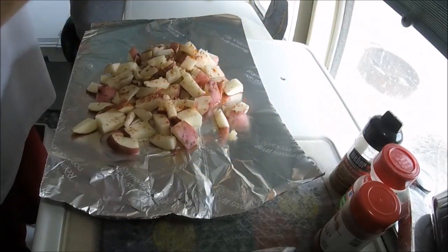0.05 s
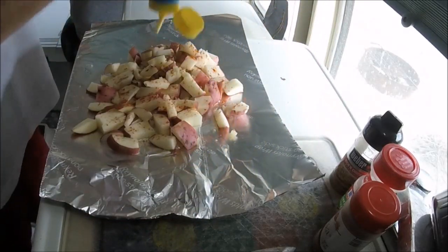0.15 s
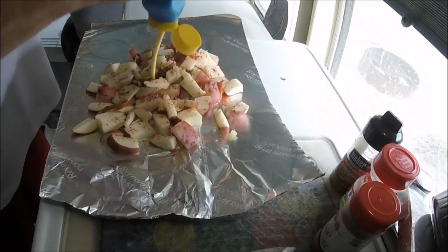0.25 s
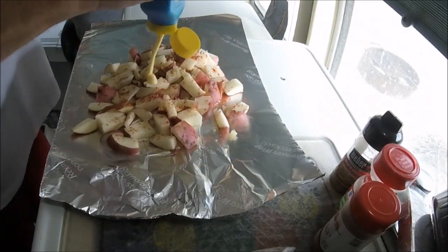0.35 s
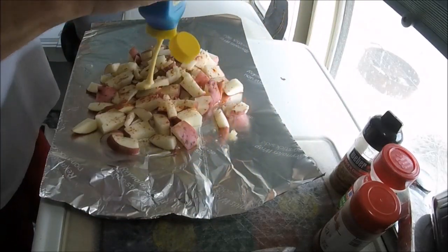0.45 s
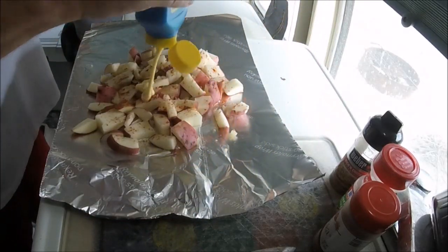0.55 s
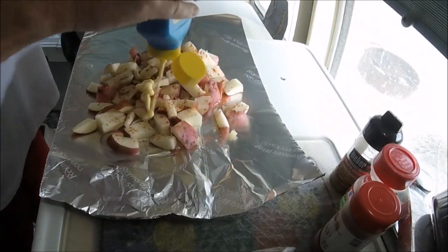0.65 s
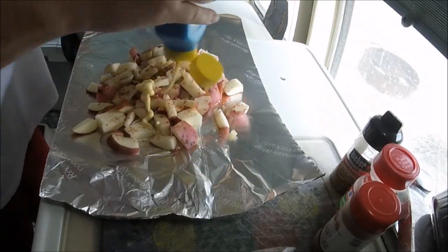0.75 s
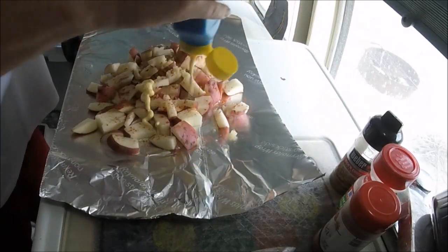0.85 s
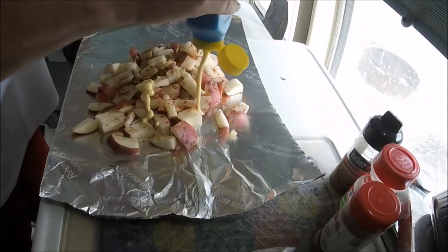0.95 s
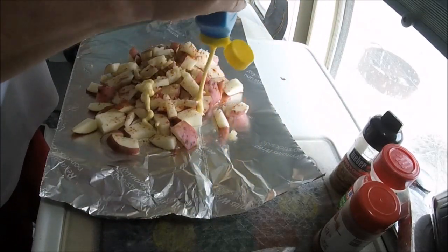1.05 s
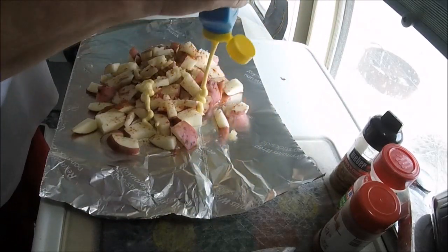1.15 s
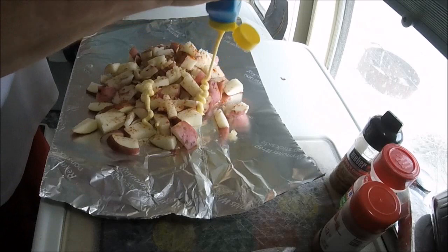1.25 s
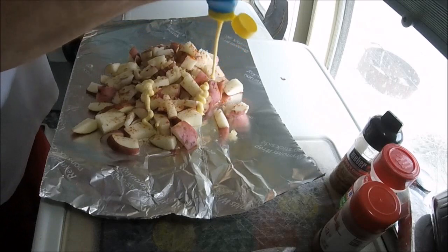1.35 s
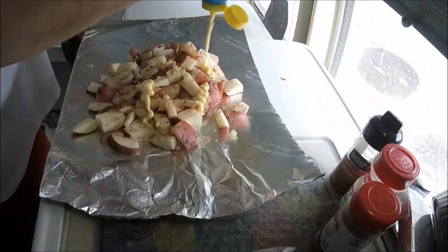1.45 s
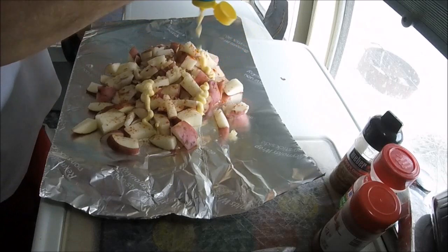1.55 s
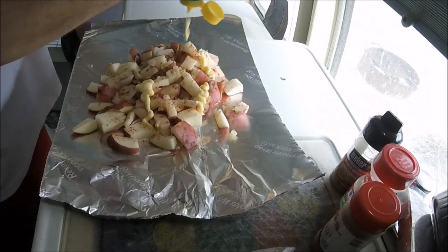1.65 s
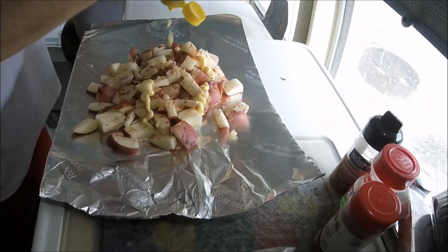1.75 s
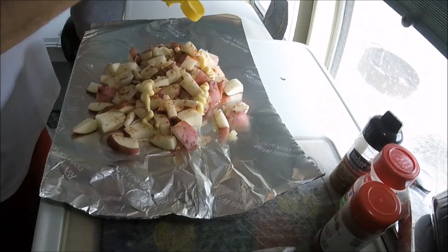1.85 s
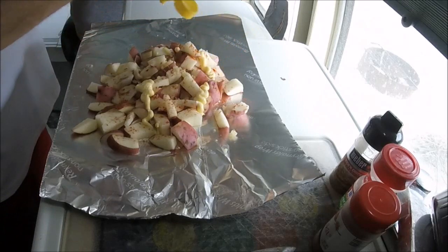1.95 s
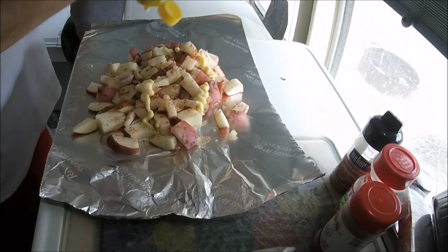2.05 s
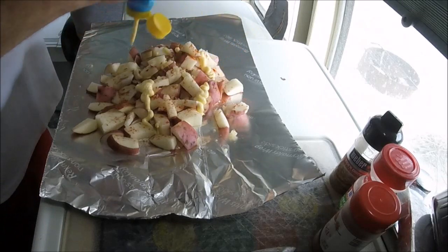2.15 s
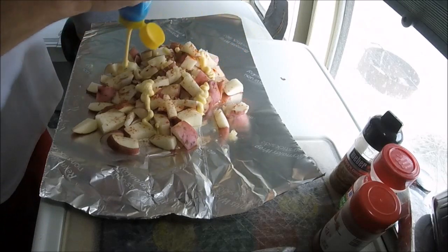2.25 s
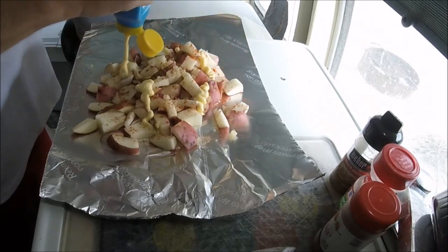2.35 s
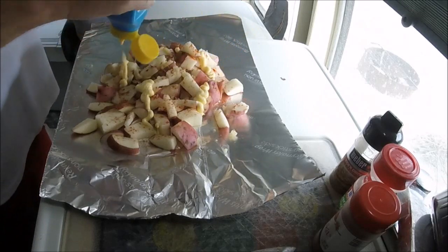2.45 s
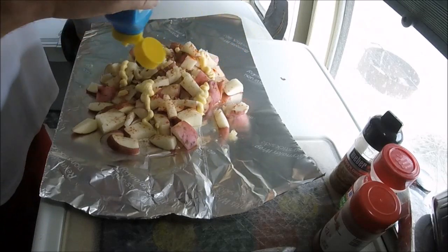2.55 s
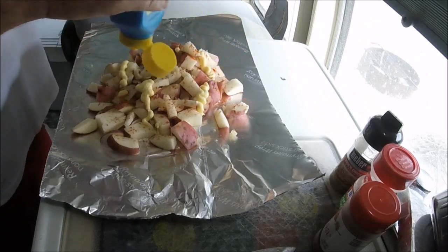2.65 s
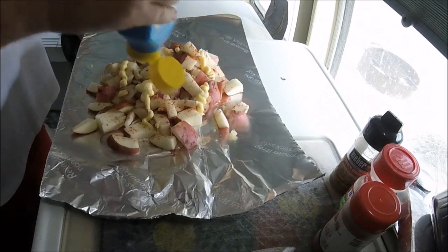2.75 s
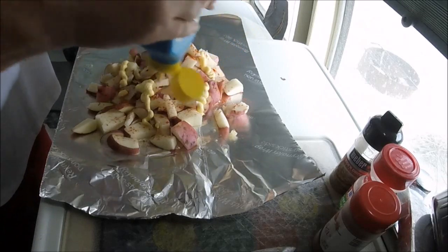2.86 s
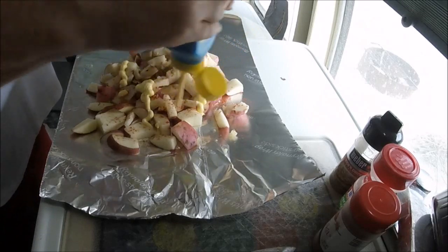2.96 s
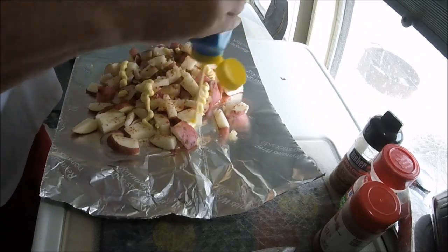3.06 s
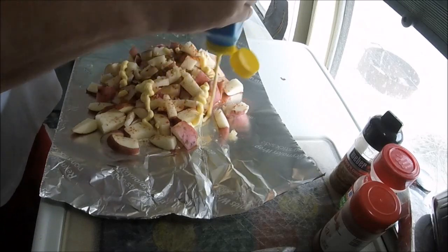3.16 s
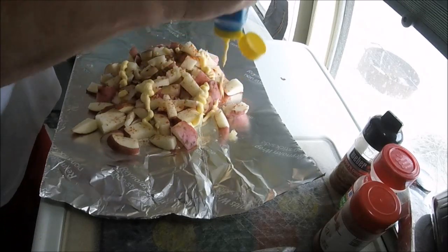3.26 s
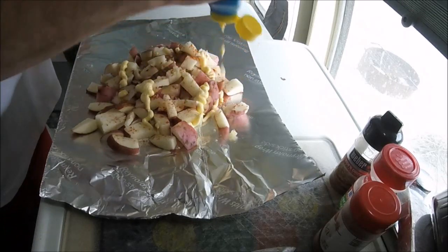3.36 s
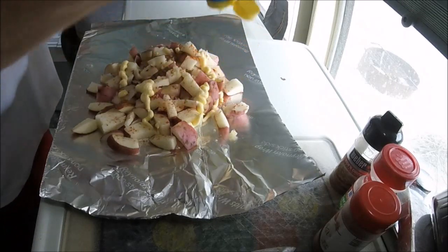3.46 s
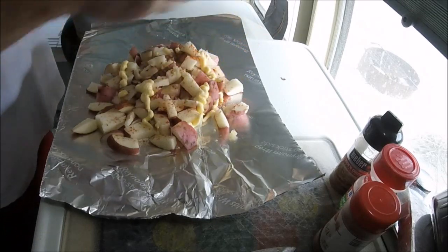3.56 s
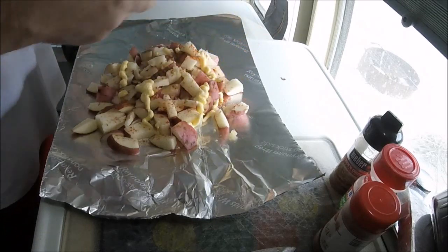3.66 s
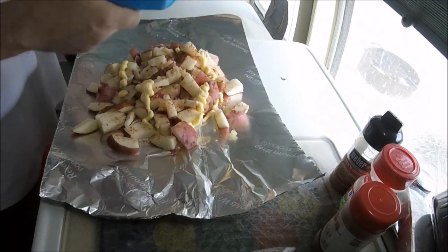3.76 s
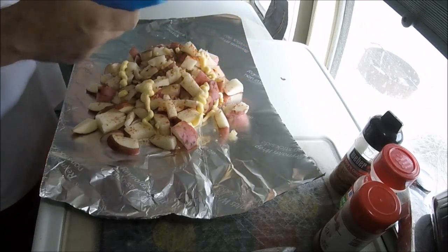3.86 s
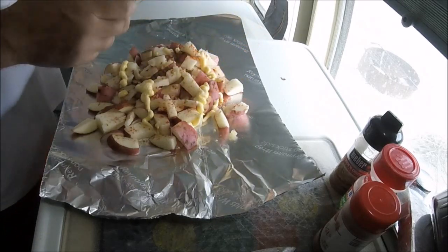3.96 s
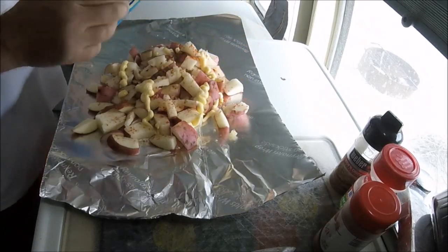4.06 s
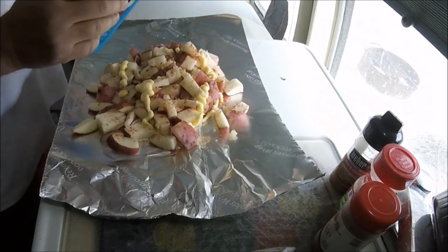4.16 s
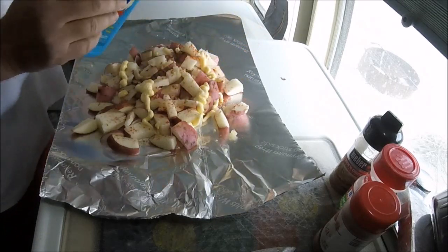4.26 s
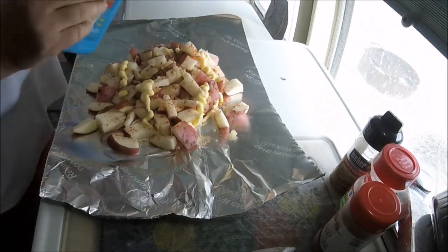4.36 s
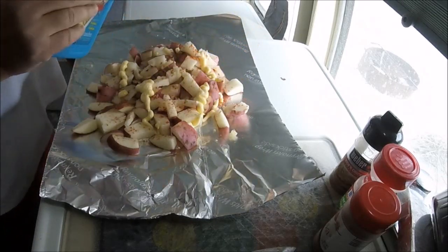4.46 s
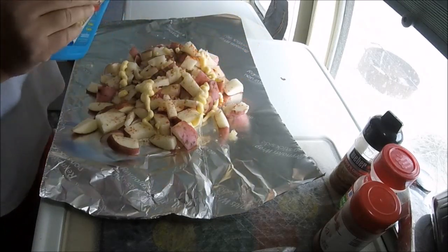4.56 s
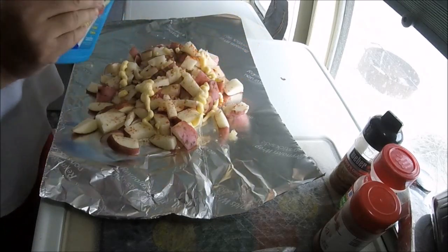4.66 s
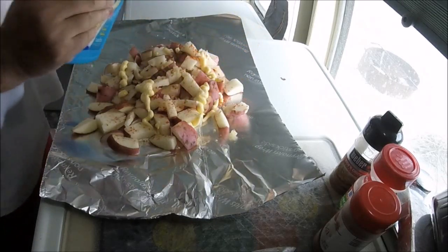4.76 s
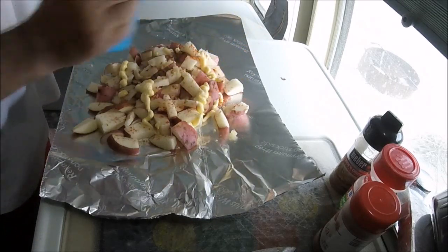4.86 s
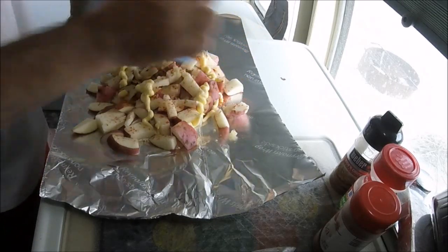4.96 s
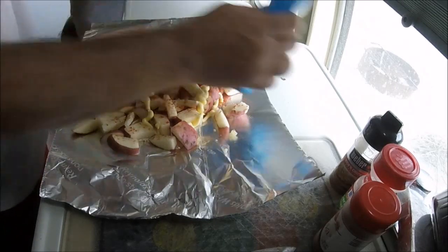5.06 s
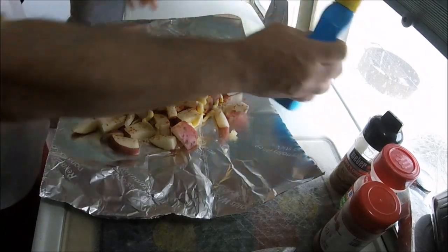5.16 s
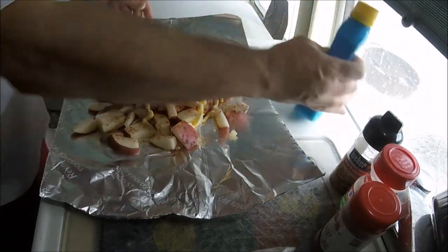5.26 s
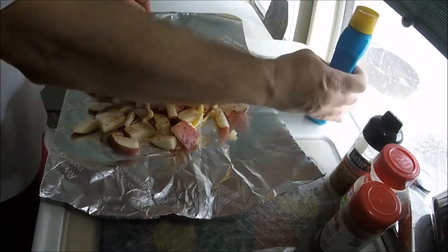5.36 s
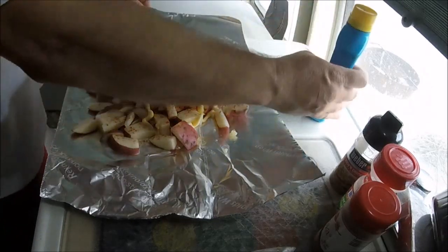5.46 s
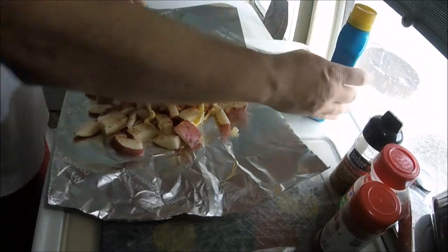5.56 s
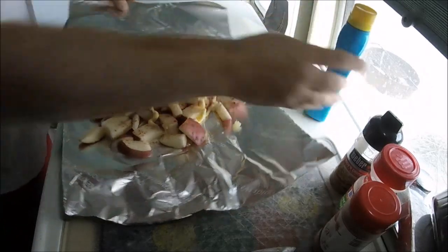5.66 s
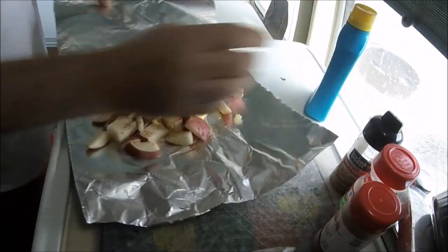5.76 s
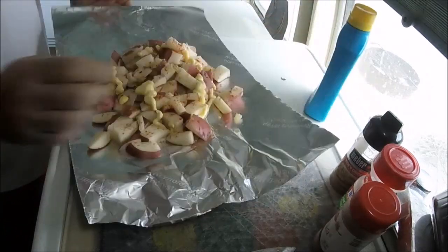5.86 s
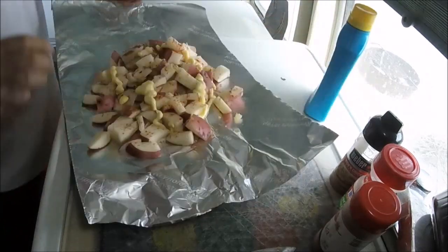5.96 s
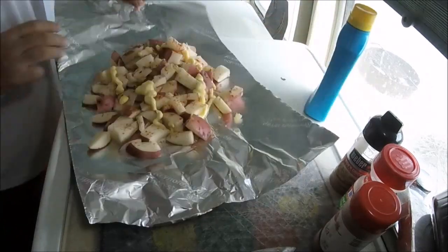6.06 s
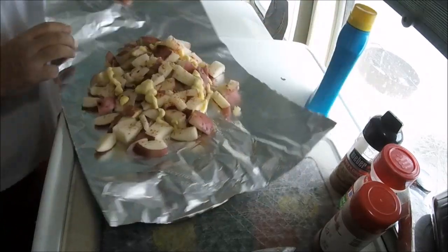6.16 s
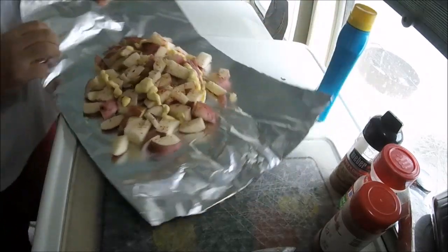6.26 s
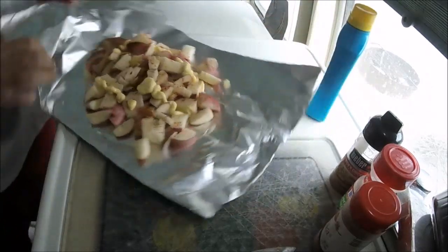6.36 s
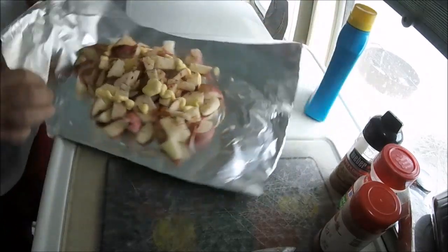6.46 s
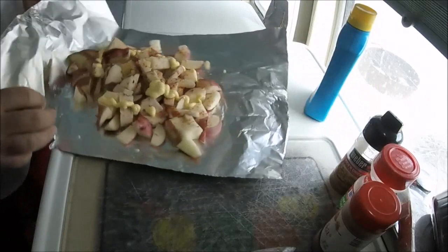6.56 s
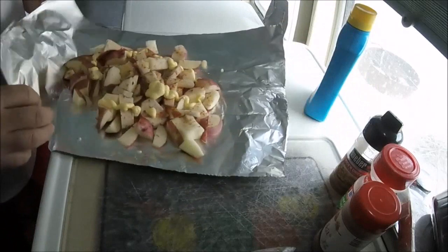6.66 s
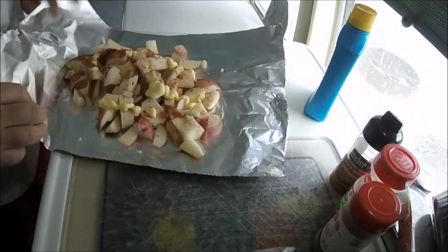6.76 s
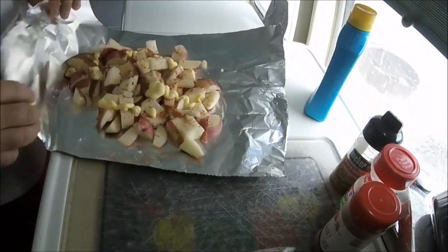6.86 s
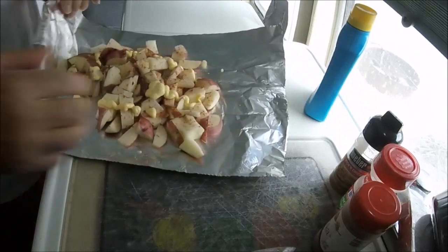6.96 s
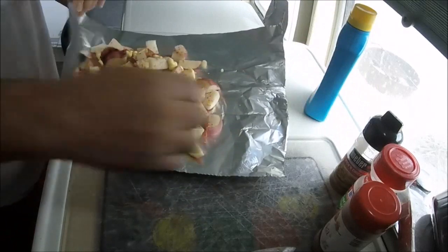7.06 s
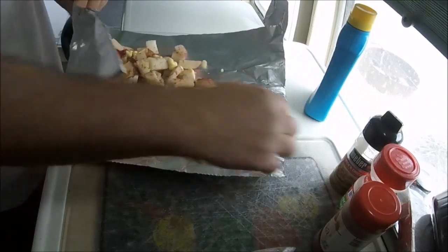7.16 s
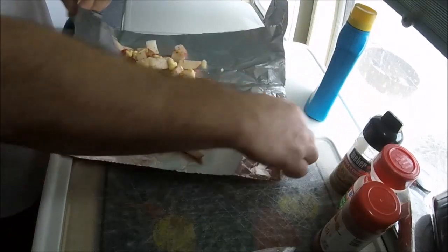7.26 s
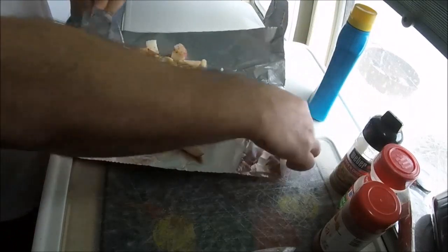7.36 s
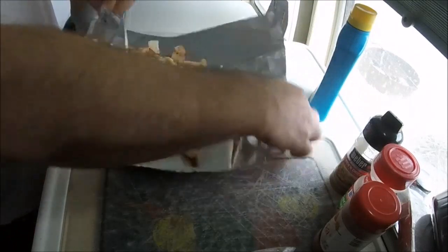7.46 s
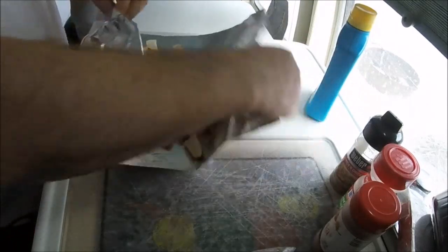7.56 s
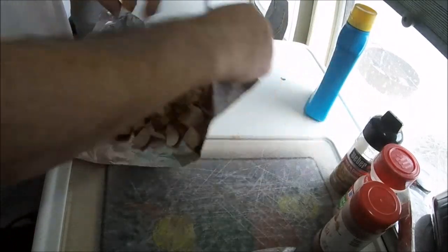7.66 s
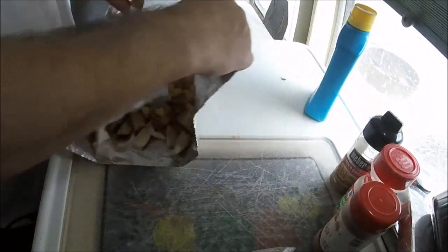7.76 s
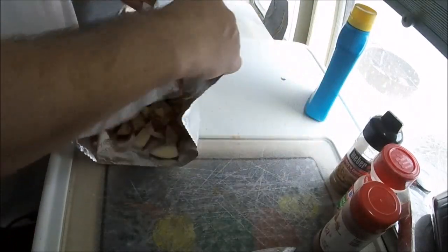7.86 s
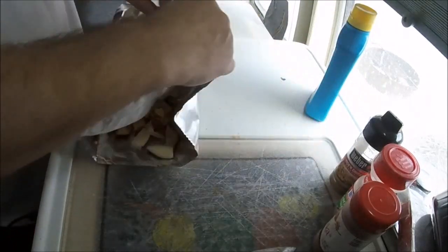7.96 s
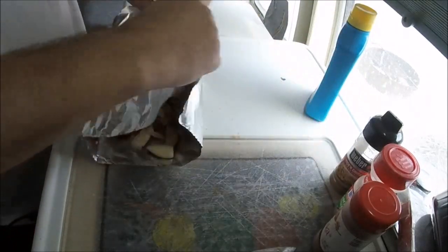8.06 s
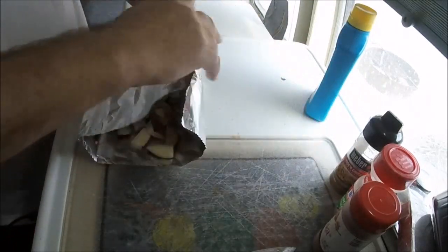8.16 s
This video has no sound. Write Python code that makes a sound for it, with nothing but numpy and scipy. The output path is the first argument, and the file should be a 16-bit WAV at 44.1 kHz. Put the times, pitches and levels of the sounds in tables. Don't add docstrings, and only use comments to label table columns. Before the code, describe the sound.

Over a droning appliance hum, brief wet sputters, a sharp plastic click and a knock, then foil crinkling, juddering and folding with bumps.

```python
import sys
import numpy as np
from scipy import signal
from scipy.fft import rfft, irfft, dct, next_fast_len
from scipy.io import wavfile
from scipy.ndimage import uniform_filter1d

SR = 44100
rng = np.random.default_rng(int(sys.argv[2]) if len(sys.argv) > 2 else 0)


def generate_wav(signal):
    frames = np.transpose(np.atleast_2d(signal))
    scaled = np.clip(frames, -1, 1) * 32767
    pcm = np.round(scaled).astype(np.int16)
    wavfile.write(sys.argv[1], SR, pcm)


def gain_from_decibels(decibels):
    exponent = np.asarray(decibels, float) / 20
    return 10 ** exponent


N = 361517


def rms_one(x):
    return x / np.sqrt(np.mean(x ** 2) + 1e-20)


def at_hz(points, hz):
    points_hz, points_db = np.transpose(points)
    return np.interp(np.log(hz), np.log(points_hz), points_db)


def drift(rate):
    r = np.exp(-80 * np.pi * rate / SR)
    slow = signal.lfilter([1], [1, -2 * r, r * r], rng.standard_normal(N // 40 + 2002))[2000:]
    return np.interp(np.arange(N) / 40, np.arange(len(slow)), rms_one(slow))


def ring(clicks, hz, t60):
    r, w = gain_from_decibels(-60 / (t60 * SR)), 2 * np.pi * hz / SR
    return signal.lfilter([0, np.sin(w)], [1, -2 * r * np.cos(w), r * r], clicks + 1e-18)


def resonance(x, hz, width):
    r = np.exp(-np.pi * width / SR)
    w = 2 * np.pi * hz / SR
    return signal.lfilter([(1 - r * r) / 2, 0, (r * r - 1) / 2], [1, -2 * r * np.cos(w), r * r], x)


def bursts(rows, rise_s):
    out = np.zeros((3, N))
    for s, peak_db, dull_db, top_db, t60 in rows:
        at = round(s * SR)
        t = np.arange(min(N - at, SR // 2)) / SR
        shape = gain_from_decibels(-60 * t / max(t60, .005)) * np.minimum(t / max(rise_s, 1e-4), 1)
        out[:, at:at + len(t)] += gain_from_decibels(peak_db + np.array([[dull_db], [0], [top_db]])) * shape
    return out


def crackle(levels, per_s, spread_db, cycles, patchy_db, trims_db):
    # pitch in Hz, level in dB per Hz.
    facet_tone = [(530, -1.5), (900, 0), (1160, -13), (1910, -4), (2720, -13.5), (3540, -4), (6500, -6),
                  (12100, -16.5), (15500, -32)]
    dull_below_hz, top_above_hz = 2500, 8000
    sizes = gain_from_decibels(abs(spread_db) * np.minimum(rng.exponential(1, N), 4)) * rng.choice([-1, 1], N)
    snaps = rms_one(sizes * (rng.random(N) < per_s / SR))
    pitches, dealt = np.geomspace(700, 14800, 32), rng.integers(0, 32, N)
    weights = gain_from_decibels(at_hz(facet_tone, pitches)) * np.sqrt(pitches)
    weights = weights / np.sqrt(np.sum(weights[pitches > dull_below_hz] ** 2))
    patches = [gain_from_decibels(patchy_db * drift(3.9)) for _ in range(8)]
    out, first = np.zeros(N), np.argmax(levels[1] > 1e-5)
    for k, hz in enumerate(pitches):
        lift = np.sqrt(len(pitches) * 4 * np.log(1000) * hz / (cycles * SR))
        zone = int(hz > dull_below_hz) + int(hz > top_above_hz)
        envelope = levels[zone] * gain_from_decibels(trims_db[zone]) * patches[k % len(patches)]
        force = envelope * snaps * (dealt == k)
        out[first:] += weights[k] * lift * ring(force[first:], hz, cycles / hz)
    return out


def strike(hits, modes, trim_db, soft_hz):
    hits, out = np.array(hits), np.zeros(N)
    at = np.round(hits[:, 0] * SR).astype(int)
    luck_db = rng.normal(0, 1.5, (len(hits), len(modes)))
    heard = slice(at.min(), at.max() + SR)
    for k, (hz, level_db, t60) in enumerate(modes):
        clicks = np.zeros(N)
        clicks[at] = gain_from_decibels(hits[:, 1] + level_db + trim_db + luck_db[:, k])
        out[heard] += ring(clicks[heard], hz, t60) * (-1) ** k
    return signal.lfilter(*signal.butter(1, min(soft_hz, 18000), fs=SR), out)


def hum():
    fan_hz, motor_hz, mains_hz, mains_db = 23.97, 57.975, 119.935, -38.5
    fan_orders_db = [-37, -67, -61, -48.5, -60, -59.5, -40.5, -67, -68]
    motor_orders_db = [-26, -35, -41.5, -47]
    # pitch in Hz, width in Hz, rms level in dB.
    panels = [(60.1, 13, -72), (80.3, 9.1, -45.5), (126, 0.41, -53), (162.8, 3.8, -53.5), (760, 10.5, -53)]
    t = np.arange(N) / SR - 0.008
    lines = [(fan_hz * (k + 1), db) for k, db in enumerate(fan_orders_db)]
    lines += [(motor_hz * (k + 1), db) for k, db in enumerate(motor_orders_db)]
    lines += [(mains_hz, mains_db)]
    turns = rng.random(len(lines))
    turns[-1] = turns[len(fan_orders_db) + 1]
    out = np.zeros(N)
    for (hz, db), turn in zip(lines, turns):
        out += gain_from_decibels(db + 0.72 * drift(0.64)) * np.sin(2 * np.pi * (hz * t + turn))
    for hz, width, db in panels:
        shaken = resonance(rng.standard_normal(N + SR), hz, width)
        out += gain_from_decibels(db) * rms_one(resonance(shaken, hz, width)[SR:])
    return out


def air():
    # frequency in Hz, level in dB per Hz.
    air_tone = [(39, 4), (66, -6.5), (85, -3), (102, -20), (122, -9), (172, -11), (193, -12.5), (327, -20),
                (778, -19), (1120, -34), (1980, -34), (2860, -41.5), (8370, -48.5), (15500, -64)]
    air_db = -37.5
    hz = np.maximum(np.fft.rfftfreq(N, 1 / SR), 1)
    tone = rfft(rng.standard_normal(N)) * gain_from_decibels(at_hz(air_tone, hz))
    tone = tone / (1 + (45 / hz) ** 6)
    low, high = irfft(tone * (hz < 5000), N), irfft(tone * (hz >= 5000), N)
    noise = low + high * gain_from_decibels(1.9 * drift(46))
    return gain_from_decibels(air_db) * noise / np.std(irfft(tone * (hz > 200), N))


def fizz():
    cycle_hz, cycle_start_s = 25.025, 3.08
    # ms into the cycle, width in ms, level in dB.
    pulses = [(10.1, 3.1, -0.57), (27.6, 1, -1.8), (34.2, 3, -1)]
    # centre in Hz, width in Hz, rms level in dB.
    hiss_bands = [(4100, 1000, -59), (6380, 880, -60), (8310, 890, -59), (11800, 1100, -68.5)]
    ms = 1000 * ((np.arange(N) / SR - cycle_start_s) % (1 / cycle_hz))
    gate = sum(gain_from_decibels(db) * np.exp(-.5 * ((ms - at) / width) ** 2) for at, width, db in pulses)
    white = rng.standard_normal(N) * gate
    out = np.zeros(N)
    for hz, width, db in hiss_bands:
        out += gain_from_decibels(db) * rms_one(resonance(resonance(white, hz, width), hz, width))
    return out


def kitchen(x):
    t60_s, wall_cut_hz = 0.083, 21000
    size = next_fast_len(N + SR)
    hz = np.fft.rfftfreq(size, 1 / SR)
    walls, tail = 1 / (1 + 1j * hz / wall_cut_hz), 0
    for k, lag in enumerate(rng.uniform(.004, .022, 10)):
        loop = gain_from_decibels(-60 * lag / t60_s) * walls * np.exp(-2j * np.pi * hz * lag)
        tail = tail + (-1) ** k * loop / (1 - loop)
    return irfft(rfft(x, size) * tail, size)[:N]


def bottle():
    # start in seconds, peak in dB, dull part in dB, top part in dB,
    # decay in seconds.
    sputters = [(0.3858, -22.5, 2, -22, 0.043), (0.392, -13.5, -11, -30, 0.017),
                (1.5233, -39.5, 20, -10, 0.04), (1.5584, -21.5, -8, -27, 0.091),
                (1.6016, -27, 10, -14, 0.04), (1.6332, -23, -6, -18, 0.032), (1.653, -27.5, 1, -9, 0.063),
                (1.7124, -21, -1, -19, 0.049), (2.4508, -42, 5, 0, 0.04)]
    # time in seconds, peak in dB.
    cap_snap = [(4.4167, -9)]
    # pitch in Hz, level in dB, 60 dB decay in seconds.
    cap_modes = [(505, 7.5, 0.077), (670, -14, 0.062), (840, -4, 0.06), (1090, 5, 0.023), (1450, -23, 0.04),
                 (2030, 10.5, 0.027), (3090, -14, 0.028), (3730, 4, 0.035), (4220, 5, .04),
                 (5260, -1, 0.033), (6510, -15, 0.066), (8200, -2, 0.05)]
    # time in seconds, peak in dB.
    set_down = [
        (5.358, 2.5),
        (5.401, -11),
        (5.410, -14),
        (5.417, -13),
    ]
    # pitch in Hz, level in dB, 60 dB decay in seconds.
    counter_modes = [(121.7, 0.5, 0.074), (234, -3.5, 0.092), (297, 5.5, 0.073), (403, -1, 0.083),
                     (568, -6.5, 0.08), (664, -10, 0.18), (853, -1.5, 0.084), (1060, -20, 0.034),
                     (1820, -19, 0.027)]
    crack = bursts([(s, db + .5, -2.0, -10.0, .05) for s, db in cap_snap], rise_s=0.00016)
    levels = gain_from_decibels(-11.0) * bursts(sputters, rise_s=0.0018) + crack
    out = crackle(levels, per_s=36000, spread_db=1.5, cycles=16.4, patchy_db=-2.5, trims_db=[3.0, 0, 5.0])
    out += strike(cap_snap, cap_modes, trim_db=-10, soft_hz=9000)
    return out + strike(set_down, counter_modes, trim_db=-12.0, soft_hz=1500)


def taps():
    # time in seconds, peak in dB, pitch in Hz, 60 dB decay in seconds.
    low_taps = [(0.392, -14, 506, 0.025), (1.559, -11, 700, 0.026), (1.6, -14, 579, 0.023),
                (1.632, -8, 716, 0.026), (6.249, -13.5, 700, 0.047), (6.779, -7.5, 605, 0.029),
                (7.113, -17, 810, 0.02), (7.221, -7, 720, 0.017), (7.355, -2, 517, 0.025),
                (7.38, -11, 517, 0.012), (7.501, -6, 2070, 0.015), (7.521, -11, 496, 0.033),
                (7.5226, -7.5, 1950, 0.016), (7.792, -5.5, 510, 0.023), (7.805, -11, 1850, 0.031)]
    bright_ticks = [(0.393, -11.5, 6600, 0.01), (1.5604, -18, 6640, 0.012), (1.7135, -12.5, 6700, 0.0064),
                    (6.1729, -18, 6500, 0.022), (6.7784, -18, 3400, 0.012), (7.1134, -27, 6450, 0.012),
                    (7.5014, -9, 2500, 0.014), (7.5228, -6.5, 5150, 0.013), (7.7944, -17, 6440, 0.012)]
    out, t = np.zeros(N + SR), np.arange(SR // 4) / SR
    for s, db, hz, t60 in list(low_taps) + list(bright_ticks):
        at = round(s * SR)
        out[at:at + len(t)] += gain_from_decibels(db - 9.5 - 60 * t / t60) * np.sin(2 * np.pi * hz * t)
    return out[:N]


def judder():
    # time in seconds, slips per second, level in dB.
    slipping = [(6.498, 51, -50), (6.54, 55, -25.5), (6.618, 56.4, -20.5), (6.771, 54.6, -26.5),
                (6.801, 51.5, -21.5), (6.861, 58, -30), (6.92, 51, -50)]
    # pitch in Hz, width in Hz, level in dB.
    slip_modes = [(109, 12, 10), (266, 20, 3.5), (450, 200, -7.5), (624, 73, 3.5), (730, 63, 4.5),
                  (900, 180, -23)]
    first_slip_s = 6.5028
    s, per_s, level_db = np.transpose(slipping)
    t = np.arange(N) / SR
    turns = np.cumsum(np.interp(t, s, per_s) * (t > first_slip_s)) / SR
    slips = np.diff(np.floor(turns), prepend=0) * gain_from_decibels(2.0 * rng.standard_normal(N))
    slips = slips * (t < s[-1]) + 1e-18
    kick = sum(gain_from_decibels(db) * rms_one(resonance(slips, hz, width)) for hz, width, db in slip_modes)
    kick = signal.sosfilt(signal.butter(4, 1250, fs=SR, output="sos"), kick)
    return -gain_from_decibels(np.interp(t, s, level_db, left=-120, right=-120) - 15.0) * rms_one(kick)


def creases():
    # start in seconds, peak in dB, dull part in dB,
    # top part in dB, length in seconds.
    pulling = [(5.352, -19.5, -1.5, -22, 0.02), (5.3994, -20, -1.5, -18, 0.029),
               (5.433, -20, -18, -20, 0.025), (5.5, -26, -10, -16, 0.027), (5.526, -17, -20, -17.5, 0.02),
               (5.576, -18.5, -13, -15, 0.039), (5.674, -17.5, -24, -17, 0.051),
               (5.772, -26.5, -29, -9, 0.021), (5.862, -34, -28, -17, 0.027),
               (5.9434, -18.5, -17, -19, 0.031), (6.018, -28, -28, -17, 0.022),
               (6.0744, -27, -15, -9, 0.027), (6.097, -21, -11, -18, 0.028), (6.1673, -14, -17, -12, 0.048),
               (6.246, -20, -13, -12, 0.051), (6.3405, -19.5, -21, -11, 0.057),
               (6.391, -17, -27, -16, 0.042), (6.448, -32, -22, 1, 0.02), (6.503, -18.5, -22, -10.5, 0.04),
               (6.59, -24, -3, -12, 0.027), (6.6156, -13, -20, -13.5, 0.042),
               (6.675, -22.5, -14, -14, 0.027), (6.727, -20, -7, -8.5, 0.022), (6.845, -21, -4, -18, 0.024)]
    folding = [(6.9564, -14.5, -9, -15.5, 0.023), (7.0334, -18, -14, -23, 0.011),
               (7.1105, -18.5, -13.5, -24, 0.048), (7.2243, -23.5, 0.5, -15, 0.015),
               (7.2624, -19.5, -8, -13, 0.027), (7.3163, -23.5, -6.5, -19, 0.056),
               (7.37, -16.5, -10, -19, 0.023), (7.384, -23.5, -7, -19, 0.039),
               (7.4815, -14.5, -12, -18, 0.021), (7.497, -24.5, -2, -15, 0.027),
               (7.521, -16.5, -9, -13.5, 0.027), (7.557, -15, -33, -16, 0.036),
               (7.613, -16, -19.5, -17, 0.038), (7.668, -33, -16, -19, 0.022), (7.749, -24, -4, -19, 0.015),
               (7.7944, -10, -10.5, -12.5, 0.025), (7.86, -26.5, -6, -20, 0.032),
               (7.888, -25.5, -10, -12, 0.025), (7.923, -36, 8, -16, 0.019), (7.972, -24.5, -7, -9, 0.027),
               (8.011, -18, -8, -24, 0.039), (8.0494, -16, -7, -26, 0.028),
               (8.077, -15.5, -6.5, -12, 0.022), (8.187, -17.5, -10, -20.5, 0.03)]
    rise_s, sag_db = 0.0054, 6
    trims_db = np.array([[1], [0], [8]]) - 13
    out = np.zeros((3, N))
    for s, peak_db, dull_db, top_db, length in list(pulling) + list(folding):
        at, length = round(s * SR), max(length, .001)
        t = np.arange(min(N - at, SR // 2)) / SR
        release_t60 = 0.091 + 1.5 * length
        fall_db = sag_db * np.minimum(t / length, 1) + 60 * np.maximum(t - length, 0) / release_t60
        parts_db = peak_db + np.array([[dull_db], [0], [top_db]]) + trims_db
        out[:, at:at + len(t)] += gain_from_decibels(parts_db - fall_db) * np.minimum(t / rise_s, 1)
    return out


def foil():
    # time in seconds, level in dB.
    handling = [(5.36, -58), (5.56, -38), (5.98, -39.5), (6.39, -31), (6.57, -25.5), (6.88, -34),
                (7.18, -44.5), (7.53, -35), (8.2, -35.5)]
    # time in seconds, rumble in dB.
    sliding = [(5.5, -51), (5.508, -46), (5.982, -39.5), (6.508, -27.5), (6.602, -25), (6.848, -25),
               (6.972, -31.5), (7.2, -36.5)]
    # pitch in Hz, width in Hz, level in dB.
    drag_modes = [(103.4, 24, -5.5), (251.4, 17, -6.5), (479, 55, -4), (606, 103, -3), (764, 75, -4),
                  (936, 100, -7), (1052, 25, -18.5), (1576, 77, -15), (1870, 410, -6.5)]
    # time in seconds, peak in dB.
    thumps = [
        (7.316, -1),
        (7.383, -11),
        (7.514, -13.5),
    ]
    # pitch in Hz, level in dB, 60 dB decay in seconds.
    board_modes = [(129.4, -4, 0.35), (150, 5, 0.11), (190, -12, 0.096), (248, -10, 0.091),
                   (372, -10, 0.067), (495, -10.5, 0.11), (700, -11.5, 0.11)]
    t = np.arange(N) / SR
    rustle = gain_from_decibels(np.interp(t, *np.transpose(handling), left=-120) - 6.5 + 2.05 * drift(37))
    folds = creases()
    levels = rustle * gain_from_decibels(np.array([[-3.5], [0], [-15]])) + folds
    out = crackle(levels, per_s=9000, spread_db=0.5, cycles=30.3, patchy_db=2.0, trims_db=[6.0, 0, 7.0])
    grit = rng.standard_normal(N) * gain_from_decibels(1.9 * drift(46))
    drag = np.zeros(N)
    for k, (hz, width, db) in enumerate(drag_modes):
        drag += gain_from_decibels(db) * rms_one(resonance(grit, hz, width)) * (-1) ** k
    path = list(sliding) + [(9.2, -52)]
    rubbing = gain_from_decibels(np.interp(t, *np.transpose(path), left=-120) - 4.0)
    rubbing = rubbing + gain_from_decibels(2) * folds[0]
    out += rubbing * rms_one(drag)
    return out - strike(thumps, board_modes, trim_db=-8.0, soft_hz=700)


def scene():
    kitchen_db = -13
    near = bottle() + foil() + judder() + taps()
    return near + gain_from_decibels(kitchen_db) * kitchen(near) + hum() + air() + np.zeros((1, N))


def thin_out(x):
    # centre in seconds, height in dB over the neighbourhood that survives.
    thin_moments = [(.875, 6), (4.545, 3), (4.592, 3), (4.928, 3), (5.103, 3), (5.927, 3), (6.147, 4),
                    (6.211, 3), (6.368, 7), (6.426, 4), (6.467, 5), (6.699, 2), (6.769, 3), (6.85, 4),
                    (7.598, 2), (8.023, 5), (8.063, 5)]
    out, size = x.copy(), 1700
    window, hz = signal.windows.tukey(size, .7), np.arange(size) * SR / (2 * size)
    treble = hz > 1100
    for s, step_db in thin_moments:
        at = round(s * SR) - size // 2
        lines = dct(out[at:at + size] * window, norm="ortho")
        local = np.sqrt(uniform_filter1d(lines ** 2 * treble, size=90))
        gain = np.where(abs(lines) < gain_from_decibels(step_db) * local, gain_from_decibels(-16), gain_from_decibels(2))
        out[at:at + size] += dct(lines * (gain - 1) * treble, 3, norm="ortho")
    return out


def band_limit(x):
    return signal.sosfilt(signal.butter(12, 15870, fs=SR, output="sos"), x)


def record(dry):
    # pitch in Hz, width in Hz, lift in dB.
    housing = [(1998, 214, 4.5), (3620, 1600, 1), (6450, 360, 5.5), (8400, 290, 7), (11550, 300, 1)]
    cutoff_hz = 15650
    x = dry + sum((gain_from_decibels(db) - 1) * resonance(dry, hz, width) for hz, width, db in housing) + fizz()
    x = np.clip(x, -1, 1)
    x = signal.sosfilt(signal.cheby2(12, 50, cutoff_hz, fs=SR, output="sos"), x)
    return band_limit(thin_out(x[0])[None])


dry = scene()
out = record(dry)
generate_wav(out)
```